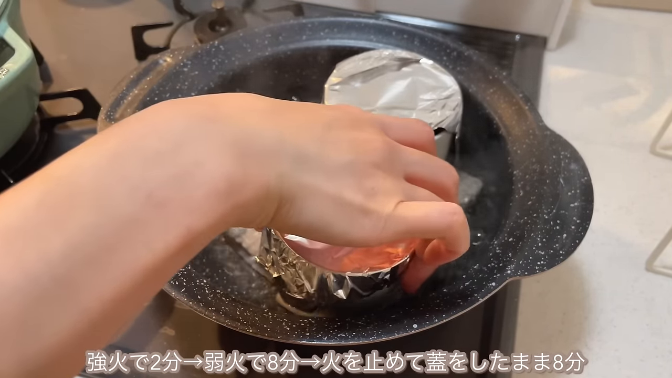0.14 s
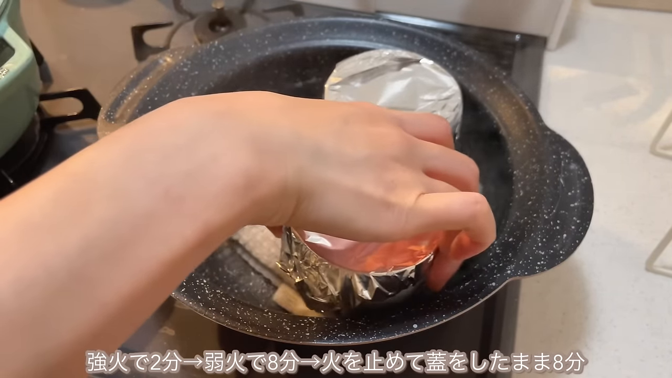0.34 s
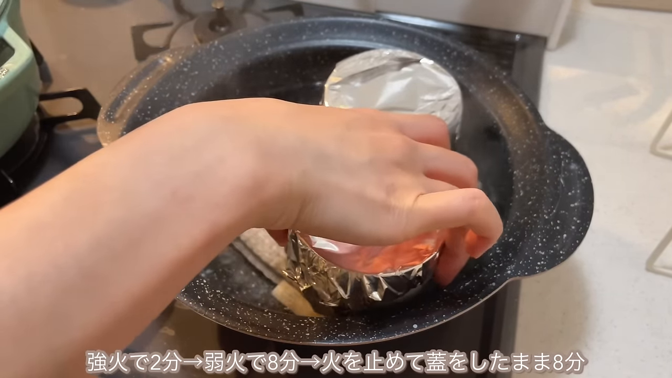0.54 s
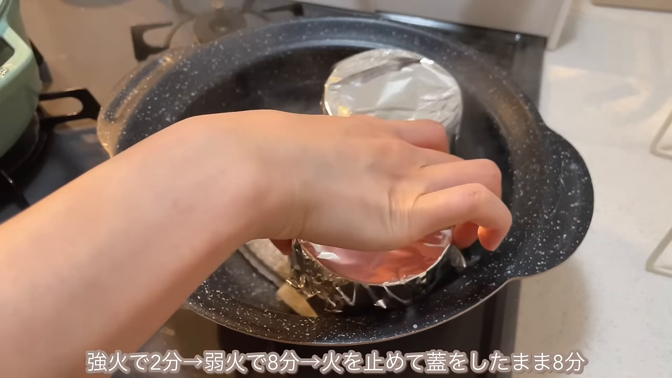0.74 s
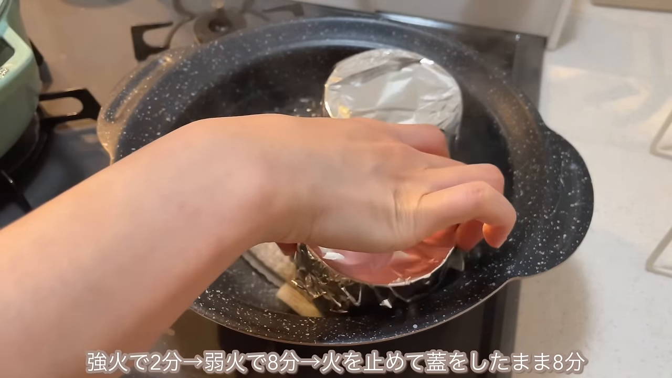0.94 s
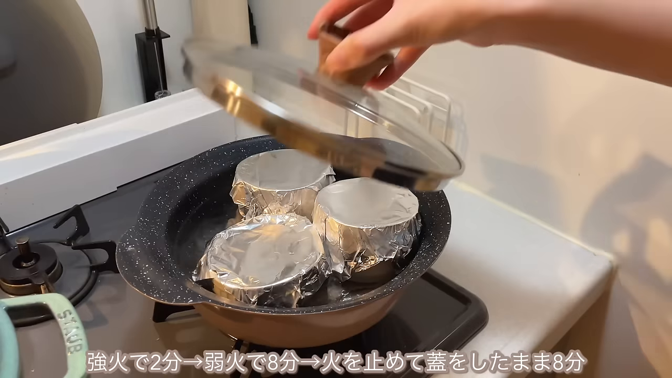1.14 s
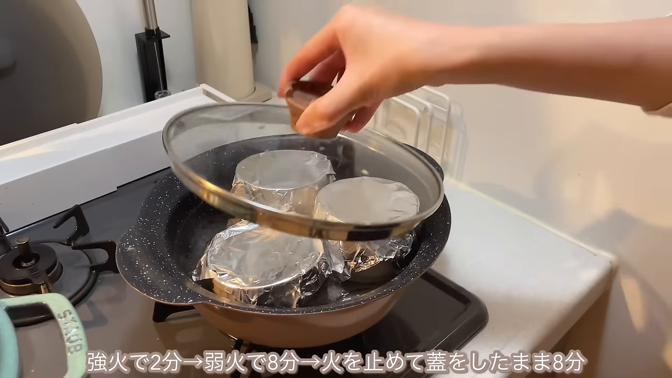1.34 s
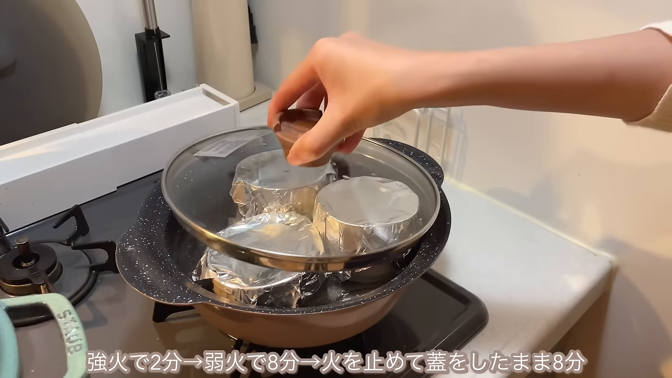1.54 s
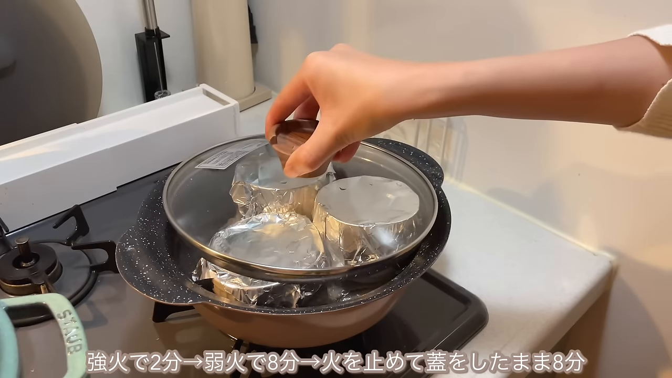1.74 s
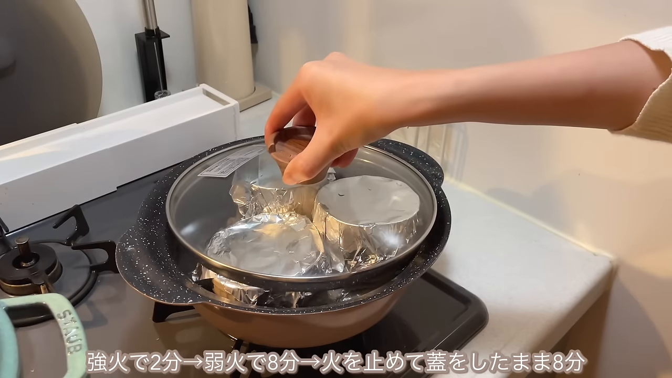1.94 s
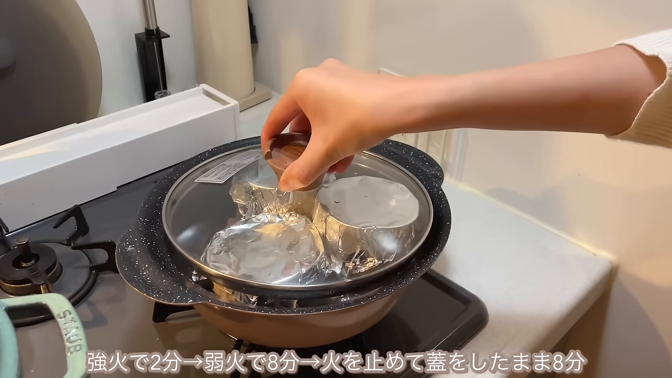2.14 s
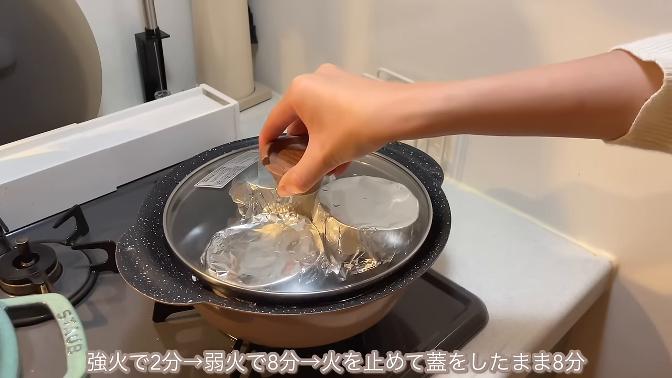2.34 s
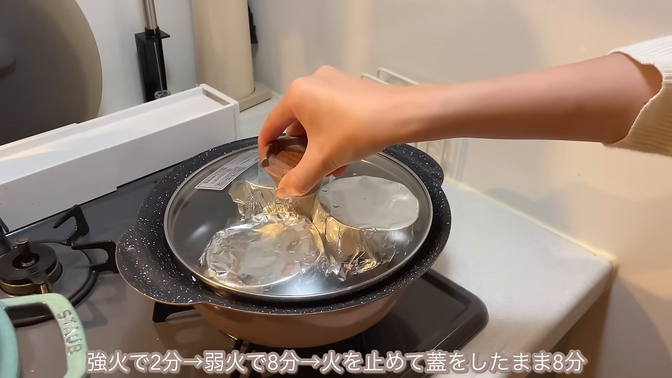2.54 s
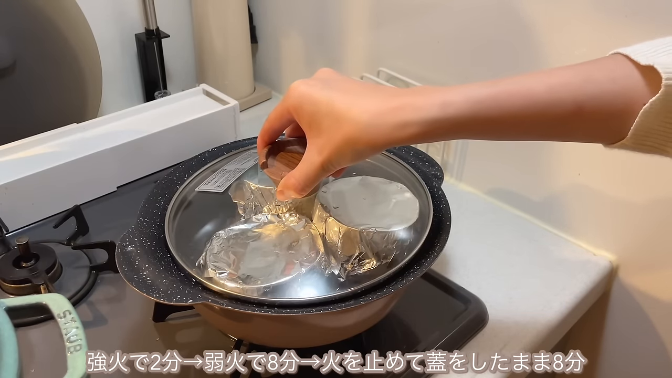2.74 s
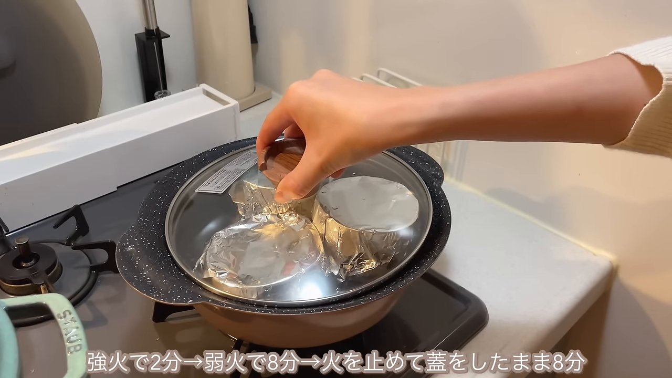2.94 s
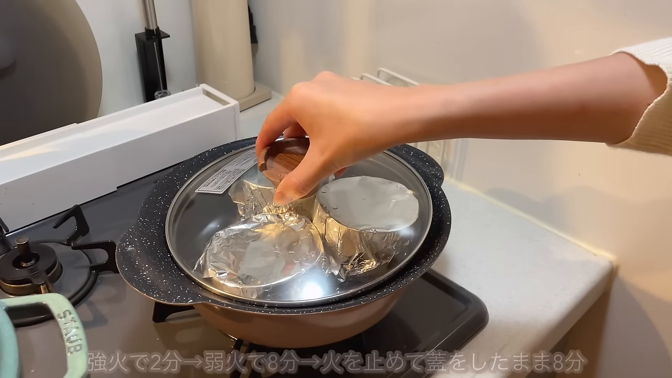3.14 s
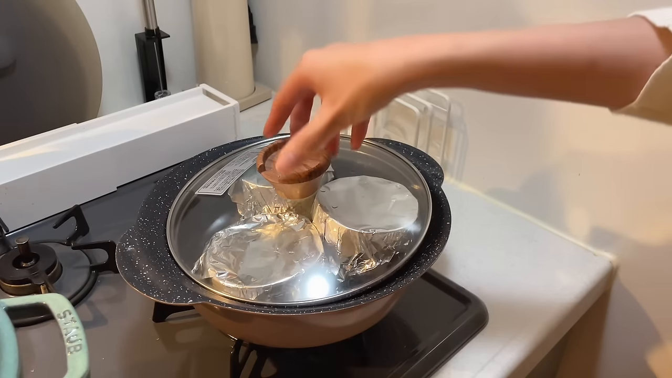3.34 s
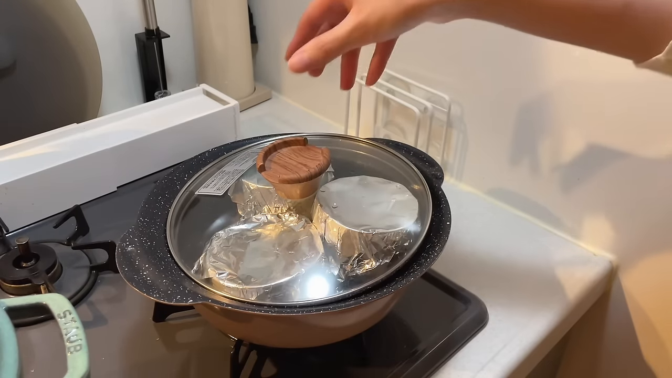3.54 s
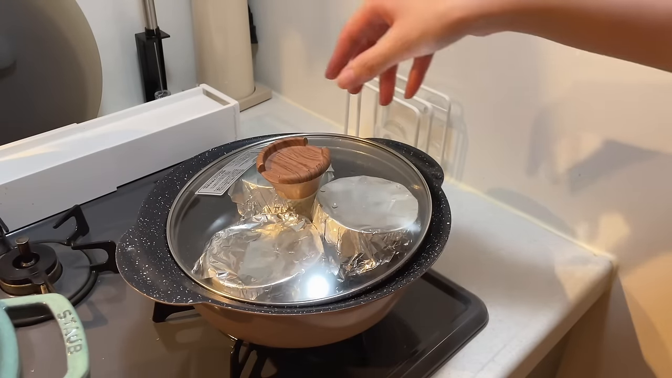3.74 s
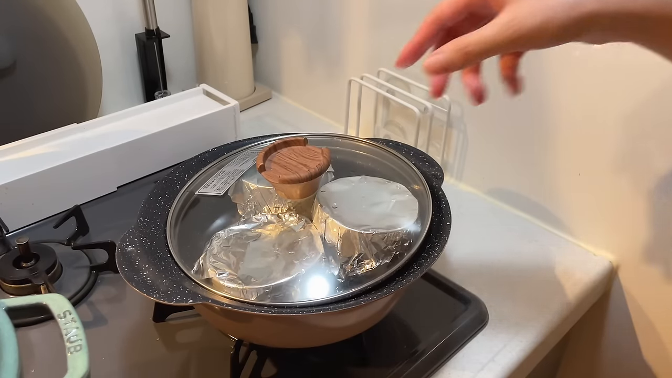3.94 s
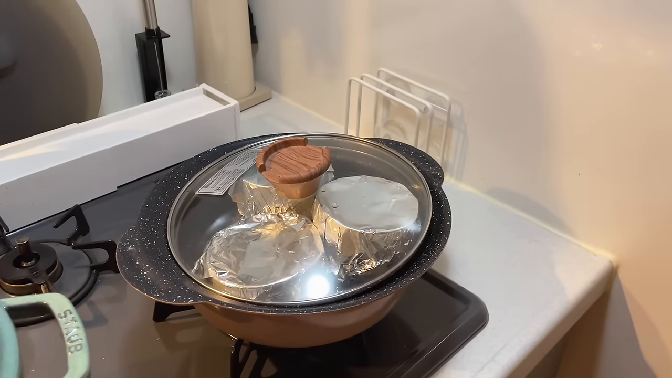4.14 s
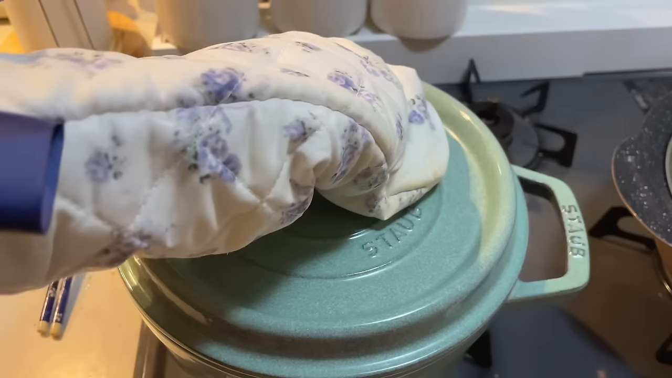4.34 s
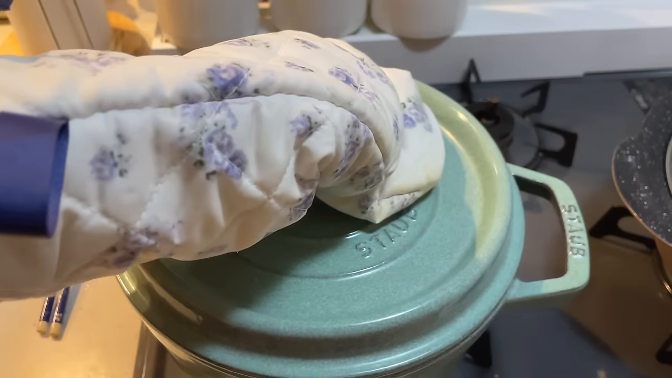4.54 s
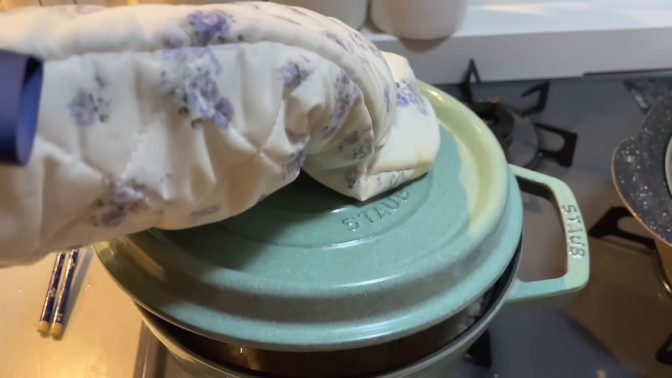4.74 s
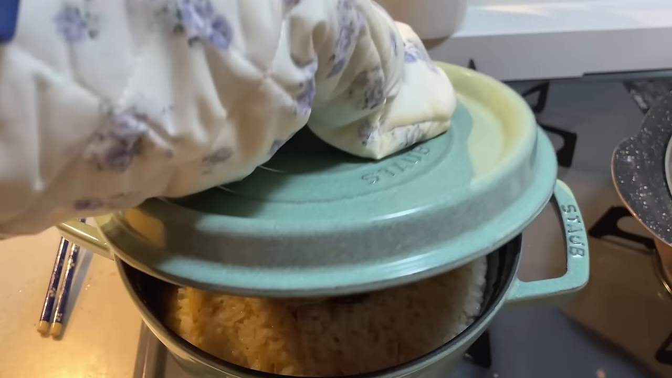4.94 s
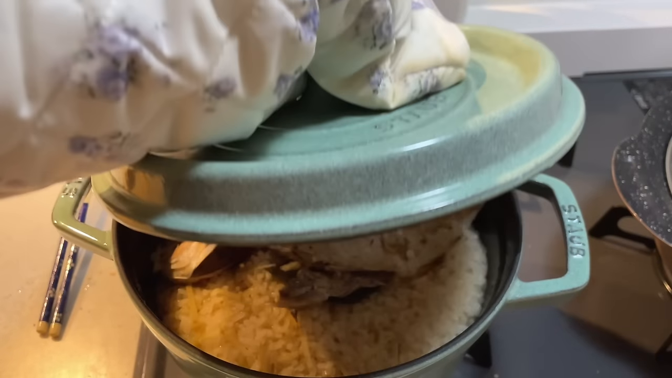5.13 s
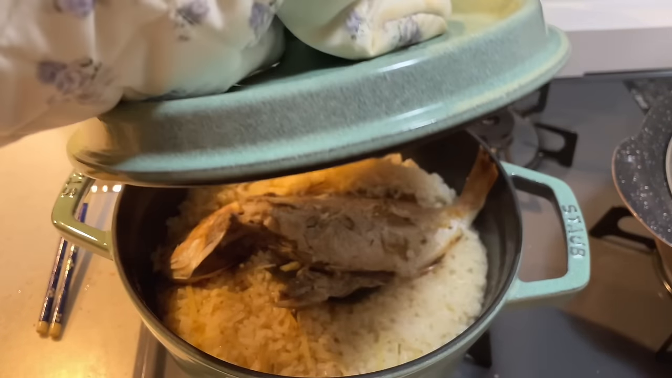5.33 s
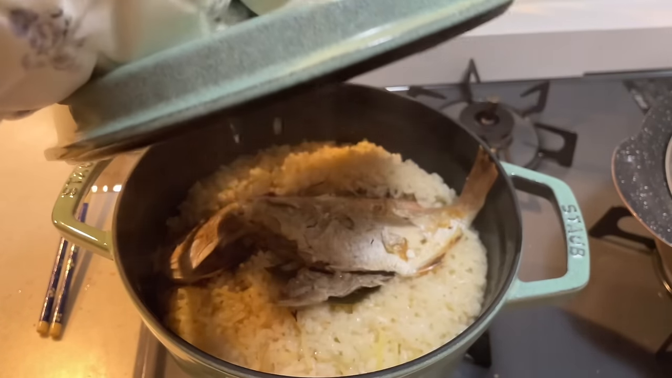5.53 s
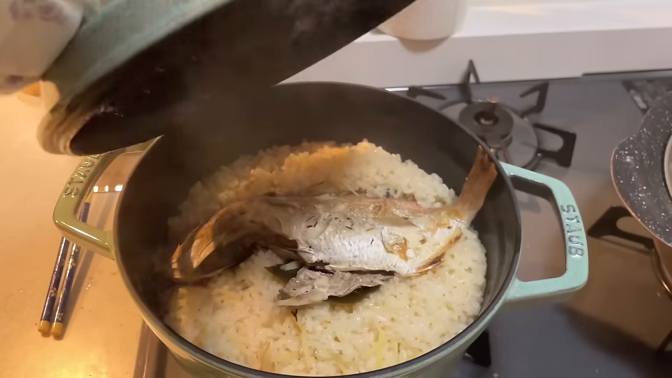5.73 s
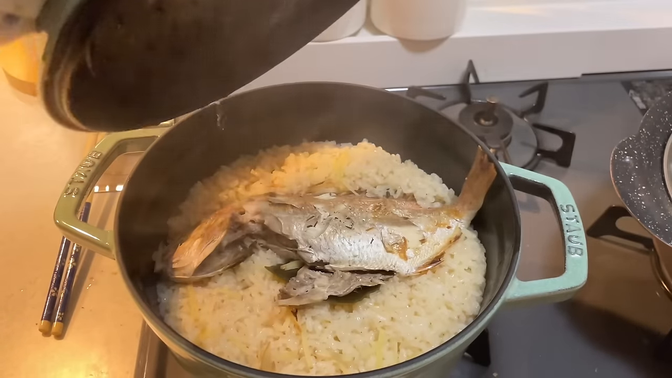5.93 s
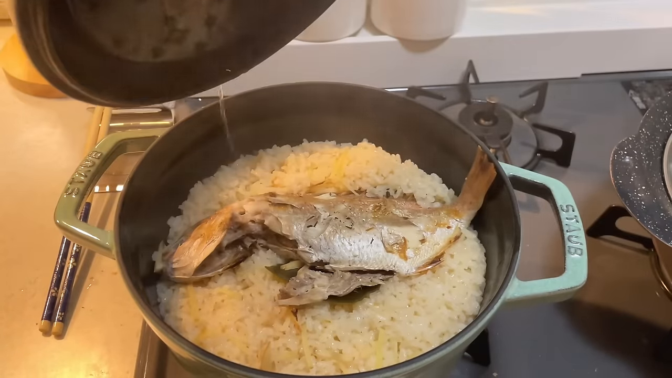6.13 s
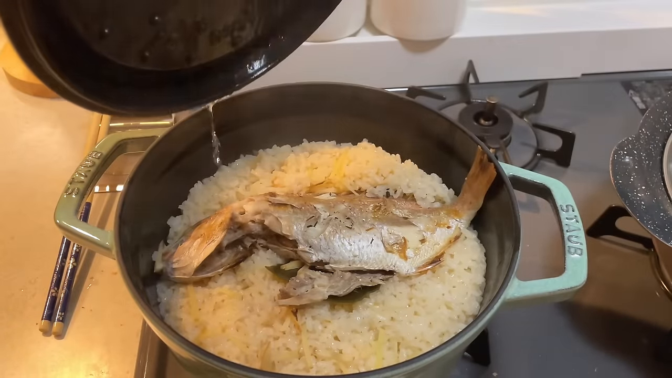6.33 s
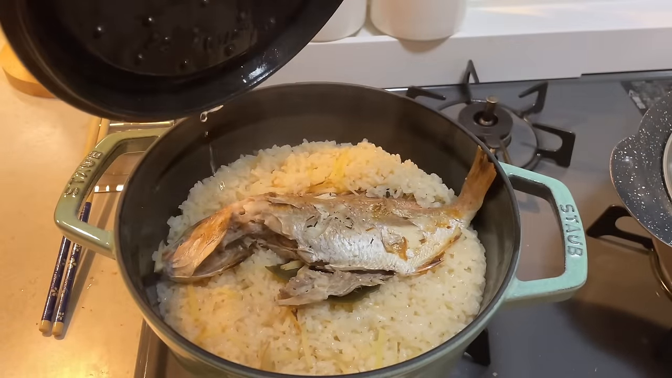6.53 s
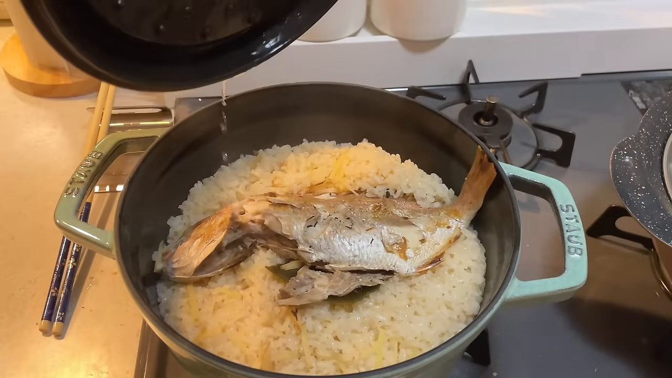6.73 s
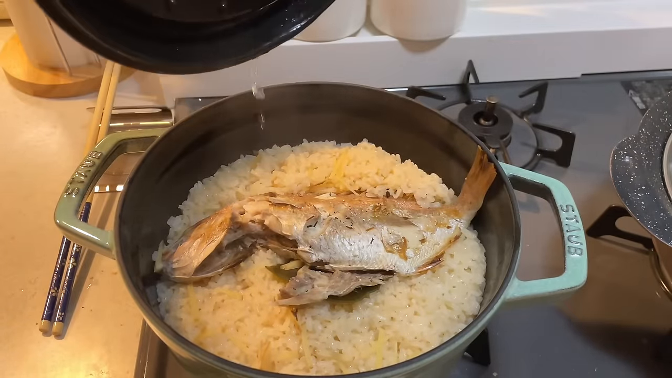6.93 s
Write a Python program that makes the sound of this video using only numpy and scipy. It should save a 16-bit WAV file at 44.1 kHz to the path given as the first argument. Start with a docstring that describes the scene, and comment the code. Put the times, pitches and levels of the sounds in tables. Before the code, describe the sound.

Foil crinkles sharply over a cup with dull taps, a glass lid clinks onto a pan, then a heavy iron lid scrapes, knocks and rings above steam and drips.

```python
"""Foil and lids in a kitchen

Two scenes joined by a hard cut, heard at close range. First, fingers crumple the foil over a cup (swarms of
clicks) while the cup taps a pan (damped modes). Then the foil still buckles now and then, a glass lid is set on
a pan, and an iron lid scrapes, rings and knocks (modes driven by impulses and stick-slip noise); drops of water
snap as noise bursts over fizzing steam. Appliances hum as filtered noise; a phone mixes it all to wide stereo.
"""
import sys
import numpy as np
from scipy import signal
from scipy.fft import rfft, irfft
from scipy.io import wavfile
from scipy.ndimage import uniform_filter1d

SR = 44100
rng = np.random.default_rng(int(sys.argv[2]) if len(sys.argv) > 2 else 0)


def dump(signal):
    """Clip the signal to [-1, 1] and save it as 16-bit WAV at the path in sys.argv[1]."""
    limited = np.clip(np.atleast_2d(signal).T, -1, 1)
    pcm = np.round(limited * 32767).astype(np.int16)
    wavfile.write(sys.argv[1], SR, pcm)


N = 312208
TIME = np.arange(N) / SR
HZ = np.maximum(np.arange(N // 2 + 1) * SR / N, 1)
CUT_S = .988  # the first scene stops dead here


def undb(db):
    """Amplitude ratio: twenty decibels make a factor of ten."""
    return 10 ** (np.asarray(db) / 20)


def since(seconds, fade_db_per_s):
    """Exponential decay: a gain that jumps to 1 at a moment and then loses level steadily."""
    return (TIME >= seconds) * undb(-fade_db_per_s * np.maximum(TIME - seconds, 0))


def colour(x, spectrum):
    """Spectral shaping: filter by (Hz, relative dB) points joined over log frequency, then bring to rms 1."""
    hz, db = np.transpose(spectrum)
    gain = undb(np.interp(np.log(HZ), np.log(hz), db))
    y = irfft(rfft(x) * gain, N)
    return y / np.std(y)


def band(x, low_hz, high_hz):
    """Band-pass filtering by a Butterworth filter."""
    edges = [low_hz, min(high_hz, .45 * SR)]
    return signal.sosfilt(signal.butter(2, edges, "band", fs=SR, output="sos"), x)


def crackle(spread_db):
    """Impulsive noise: samples scatter exponentially in level, giving dense clicks of rms 1."""
    level_db = spread_db * np.minimum(rng.exponential(size=N), 8)
    x = rng.standard_normal(N) * undb(level_db)
    return x / np.std(x)


def walk(rate):
    """Slow fluctuation: noise averaged twice over 1 / rate seconds, standard deviation 1."""
    k = int(SR / rate)
    x = uniform_filter1d(uniform_filter1d(rng.standard_normal(N), k), k)
    return x / np.std(x)


def blows(seconds, db):
    """Impulsive excitation: one single-sample force per blow."""
    x = np.zeros(N)
    x[(np.asarray(seconds) * SR).astype(int)] = undb(db)
    return x


def ring(force, modes, clatter_db, clatter_hz, clatter_t60):
    """Modal synthesis: a force drives one second of decaying modes and noise for unresolved overtones."""
    t = np.arange(SR) / SR
    hz, db, t60 = np.transpose(modes)[:, :, None]
    tones = undb(db) * np.sin(2 * np.pi * hz * t) * undb(-60 * t / t60)
    sides = (-1) ** np.arange(len(modes))[:, None]  # neighbouring modes push opposite ways
    overtones = band(rng.standard_normal(SR), clatter_hz / 3, clatter_hz * 2.2)
    overtones = overtones * undb(clatter_db - 60 * t / clatter_t60)
    contact = (1 - np.exp(-t / 0.0008)) * (1 + 1.6 * np.exp(-t / 0.0035))  # the first milliseconds are loudest
    response = ((sides * tones).sum(axis=0) + overtones) * contact
    return signal.oaconvolve(force, response)[:N]


# Buckles of the foil. Each row: start in seconds, middle level in dB, treble minus middle level in dB.
BUCKLES = [(0.37, -58.5, -10.5), (0.391, -46.5, 4.5), (0.482, -44.5, 3.5), (0.523, -49, -0.5),
           (0.573, -33, 9), (0.58, -26.5, 1.5), (0.661, -50, 7), (0.742, -40.5, 2.5), (0.809, -43.5, 0),
           (0.826, -44.5, -2), (0.934, -40.5, -5.5), (0.95, -35, 2.5), (0.97, -28.5, 0.5), (1.916, -50, -4),
           (2.155, -47, 8.5), (2.516, -65.5, 1), (2.66, -60.5, -7), (2.908, -54, -3.5), (3.262, -53.5, 1.5),
           (3.315, -55.5, -2)]
# Spectrum of the foil clicks. Each row: frequency in Hz, relative level in dB.
FOIL_SPECTRUM = [(300, -19.5), (900, -6.5), (1400, 9.5), (2200, 3), (3500, 7), (4500, -4), (7000, 0),
                 (9000, 1.5), (13000, -3.5), (16000, -9)]
# Squeezes of the fingers, after which the foil creeps less and less. Each row: start in seconds, level in dB.
SQUEEZES = [(.392, -71.5), (.49, -45.5), (.6, -50.5), (.75, -47), (.85, -47.5), (.92, -45)]
PATCHES_HZ = np.geomspace(500, 8300, 12)  # edges of the foil bands that swell on their own
BUILD_S, BUCKLE_T60_S = 0.0046, 0.045
CREEP_FADE_DB_PER_S, RESTING_DB = 61, -68


def foil():
    """Buckling of a thin sheet: swarms of clicks build and fade, bunch up and wander in colour."""
    clicks = colour(crackle(spread_db=3.5) * undb(1.8 * walk(300)), FOIL_SPECTRUM)
    middle = sum(band(clicks, low, high) * undb(2.2 * walk(120))
                 for low, high in zip(PATCHES_HZ, PATCHES_HZ[1:]))
    treble = band(clicks, 9400, 15000)

    # Creep in the first scene: the strongest squeeze still fading, above a resting floor
    squeezed = [undb(db) * since(s, CREEP_FADE_DB_PER_S) for s, db in SQUEEZES]
    creep = undb(RESTING_DB) + np.max(squeezed, axis=0)
    ticks = band(crackle(spread_db=8.0), 1500, 15000) * undb(-8.5)  # lone creases snapping
    ticks = ticks * (TIME > SQUEEZES[0][0])
    rustle = band(crackle(spread_db=7.0), 280, 897.3)  # the cup shifts under the fingers
    rustle = rustle * undb(2.8 * walk(25) + 2.0)
    out = creep * (middle + treble + rustle + ticks) * (TIME < CUT_S)

    for s, db, treble_db in BUCKLES:
        t = TIME - s
        build = np.clip(t / BUILD_S, 0, 1) ** 2
        fade = undb(-60 * np.maximum(t - BUILD_S, 0) / BUCKLE_T60_S)
        swell = build * fade * ((TIME < CUT_S) | (s > CUT_S))  # nothing rings on across the cut
        for part, part_db in ((middle, db), (treble, db + treble_db)):
            burst = swell * part
            # give every burst the energy of its swell, however the clicks fall
            out += undb(part_db) * burst * np.linalg.norm(swell) / np.linalg.norm(burst)
    return out


# Touches of lid and pan. Each row: start in seconds, pan level in dB, favoured pitch in Hz, glass level in dB.
SET_DOWN = [(1.802, -59, 900, -89), (1.918, -31, 595, -47.5), (1.932, -34, 480, -45),
            (1.944, -33.5, 320, -55), (2.034, -54.5, 890, -54.5), (2.154, -26.5, 601, -26),
            (2.181, -23.5, 648, -24), (2.221, -39, 692, -43.5), (2.237, -39, 1100, -48.5),
            (2.906, -30, 620, -65), (3.127, -57.5, 801, -91), (3.746, -58, 790, -95)]
# Modes of the pan. Each row: frequency in Hz, level in dB, t60 in seconds.
PAN_MODES = [(97.5, 3, 0.18), (353, -2.5, 0.03), (420.5, -5, 0.098), (498, -4.5, 0.035), (615, 1, 0.036),
             (720, 5.5, 0.0081), (1034, -10.5, 0.19), (1106, -6.5, 0.07), (1494, -13, 0.16),
             (1857, -16.5, 0.085), (2328, -13, 0.1)]
# Modes of the glass lid, one entry per mode: frequency in Hz, level in dB, t60 in seconds when undamped.
GLASS_HZ = [1721, 2134, 2180, 2397, 2547, 2722, 3238, 4177, 4387, 4700, 5275, 6072, 6810, 7558]
GLASS_DB = [-9.5, -5, -6.5, -11.5, -8, -2.5, -6.5, -10, -16, -15.5, -15, -14, -17.5, -15]
GLASS_T60_S = [0.072, 0.16, 0.078, 0.19, 0.03, 0.035, .12, 0.068, 0.11, 0.059, 0.05, .09, 0.16, 0.082]
HELD_BELOW_DB, HELD_T60_SHARE = -40, 0.14  # gentle touches are damped by the hand


def glass_lid():
    """Coupled impact: each touch rings the glass and the pan modes nearest the pitch its spot favours."""
    s, _, _, glass_db = np.transpose(SET_DOWN)
    free_modes = np.transpose([GLASS_HZ, GLASS_DB, GLASS_T60_S])
    held_modes = np.multiply(free_modes, [1, 1, HELD_T60_SHARE])
    held = glass_db < HELD_BELOW_DB
    out = ring(blows(s[~held], glass_db[~held]), free_modes, -2.5, 2600., 0.2)
    out += ring(blows(s[held], glass_db[held]), held_modes, -2.8, 3000., 0.046)

    hz, db, t60 = np.transpose(PAN_MODES)
    for s, pan_db, spot_hz, _ in SET_DOWN:
        octaves_off = np.abs(np.log2(hz / spot_hz))
        favoured = np.transpose([hz, db - 7.8 * octaves_off, t60])
        out += ring(blows([s], pan_db), favoured, -4.5, spot_hz, 0.064)
    return out


# Jolts of the seated iron lid. Each row: start in seconds, level in dB.
JOLTS = [(4.554, -21)]
# Drags over the pot rim, pushing harder until the lid lets go.
# Each row: start in seconds, length in seconds, force at the end in dB, upper limit of the grain in Hz.
DRAGS = [(4.486, 0.028, -64, 12000), (4.554, 0.04, -61.5, 1200), (4.743, 0.03, -82, 11100)]
DRAG_RISE_DB, DRAG_RELEASE_DB_PER_S = 13.5, 200.5
# Modes of the lid while it touches the pot, one entry per mode: frequency in Hz, level in dB, t60 in seconds.
SEATED_HZ = [100, 255, 291, 345, 390, 781, 839, 1718, 2120, 2756, 3420, 4945, 6648, 10550, 12790, 15160]
SEATED_DB = [-6, 2.5, -2, -3.5, -0.5, -4.5, -4.5, -6, -19, -17, -20.5, -25, -32.5, -31.5, -30, -32]
SEATED_T60_S = [0.095, .11, 0.23, 0.12, 0.11, 0.08, .05, 0.0604, .07, 0.21, 0.21, .18, 0.078, 0.18, .23,
                .25]
# Knocks of the lid on something behind the pot. Each row: start in seconds, level in dB.
KNOCKS = [(5.657, -22.5), (5.665, -27)]
# Modes that the knocks excite. Each row: frequency in Hz, level in dB, t60 in seconds.
KNOCKED_MODES = [(95.5, -16.5, 0.59), (243.3, -15, 0.156), (362.8, -11, 0.096), (510, -22.5, 0.27),
                 (689.4, -5, 0.058), (790, -6, 0.037), (994, -6, 0.033), (1250, -13, 0.13),
                 (1634, -6, 0.016), (2730, -39, 0.15)]


def iron_lid():
    """Stick-slip friction: grainy drags and sharp jolts drive the modes of the seated lid; later it knocks."""
    grip = crackle(spread_db=1.5)
    force = band(blows(*np.transpose(JOLTS)), 420, 12000)  # jolts spare the lowest modes
    for s, length, db, top_hz in DRAGS:
        still_to_rise = np.clip(1 - (TIME - s) / length, 0, 1)
        released_s = np.maximum(TIME - s - length, 0)
        push_db = db - DRAG_RISE_DB * still_to_rise - DRAG_RELEASE_DB_PER_S * released_s
        force = force + band((TIME > s) * undb(push_db) * grip, 80, top_hz)
    seated_modes = np.transpose([SEATED_HZ, SEATED_DB, SEATED_T60_S])
    scrape = ring(force, seated_modes, -4.5, 1130.0, 0.076)
    knock = ring(blows(*np.transpose(KNOCKS)), KNOCKED_MODES, -9.0, 630.0, 0.32)
    return scrape + knock


# Rings of the lifted lid. Each row: start in seconds, level in dB, cause (0 touch at the rim, 1 knock).
RINGS = [(4.785, -10.5, 0), (4.805, -9, 0), (5.664, 3, 1)]
# Modes of the free lid. Each row: frequency in Hz, level after a touch at the rim in dB,
# level after a knock in dB, t60 in seconds.
FREE_MODES = [(665, -45.5, -58.5, 2.04), (1911, -58, -52, 1.05), (1933.3, -75, -52, 1.05),
              (3365, -50, -63, 0.51), (4950, -64, -62.5, 0.4)]


def lifted_lid():
    """Free vibration: clear of the pot the modes last, one close pair beats, and the cause sets their mix."""
    modes = np.array(FREE_MODES)
    out = np.zeros(N)
    for s, db, cause in RINGS:
        excited = modes[:, [0, 1 + round(cause), 3]]
        out += ring(blows([s], db), excited, -57.5, 5200.0, 0.14)
    return out


# Taps of the cup on the pan. Each row: start in seconds, level in dB.
CUP_TAPS = [(.008, -49.5), (.058, -46.5), (.305, -59.5), (.335, -56.5), (0.583, -50), (0.828, -45)]
# Modes of the foil-covered cup. Each row: frequency in Hz, level in dB, t60 in seconds.
CUP_MODES = [(710, -7, .04), (820, 3.5, 0.016), (1190, 0, 0.022), (1608, -13.5, 0.024)]


def cup():
    """Heavily damped modes: the foil-covered cup knocks dully."""
    return ring(blows(*np.transpose(CUP_TAPS)), CUP_MODES, 2.0, 1000., 0.04)


# The loudest drops and bursting bubbles. Each row: start in seconds, peak level in dB, nominal pitch in Hz.
DROPS = [(5.052, -43.5, 13900), (5.101, -41.5, 4850), (5.221, -44, 11500), (5.253, -42, 3360),
         (5.419, -34, 7050), (5.545, -35, 13300), (5.568, -38, 12700), (5.637, -37.5, 12300),
         (5.649, -38.5, 5100), (5.929, -51, 13300), (6.144, -46.5, 4500), (6.168, -39, 7200),
         (6.1, -48, 1380), (6.209, -45.5, 5600), (6.347, -47.5, 11930), (6.389, -36.5, 13000),
         (6.659, -47.5, 10870), (6.798, -45.5, 11200), (7.029, -43.5, 9040)]
SMALL_DROPS, DRIPS_FROM_S = 40, 4.9
SMALL_DROP_DB, SMALL_DROP_HZ = -62.5, 7600  # middle of a 12 dB and a two-octave range
STEAM_FROM_S, STEAM_RISE_S, STEAM_DB, STEAM_FADE_DB_PER_S = 4.25, 0.09, -67.5, 2.5


def water():
    """Transient noise: steam fizzes, each drop is a brief snap around its pitch, small ones fall at random."""
    fizz = colour(crackle(spread_db=3.5),
                  [(800, 5.0), (3500, -11.0), (7000, -15.5), (13000, -9.0), (16000, -21)])  # (Hz, dB)
    rise = np.clip((TIME - STEAM_FROM_S) / STEAM_RISE_S, 0, 1)
    steam = undb(STEAM_DB) * rise * since(STEAM_FROM_S, STEAM_FADE_DB_PER_S)
    out = steam * undb(0.5 * walk(51)) * fizz

    t = np.arange(400) / SR
    when, size, pitch = rng.random((SMALL_DROPS, 3)).T
    small = zip(DRIPS_FROM_S + when * (TIME[-len(t)] - DRIPS_FROM_S),
                SMALL_DROP_DB + 12 * (size - .5),
                SMALL_DROP_HZ * 2 ** (2 * pitch - 1))
    for s, db, hz in [*DROPS, *small]:
        burst = rng.standard_normal(len(t)) * undb(-60 * t / .004)
        snap = band(burst, hz / 1.8, hz * 1.6)
        i = int(s * SR)
        out[i:i + len(t)] += undb(db) * snap / np.abs(snap).max()
    return out


# Spectrum of the appliances. Each row: frequency in Hz, relative level in dB per Hz.
HUM_SPECTRUM = [(25, -18), (40, -4), (62, -1), (92, -0.5), (125, -3), (170, -11), (250, -11), (400, -17),
                (900, -26), (1500, -34), (2900, -45), (3900, -42), (6000, -50), (9500, -47), (13000, -44),
                (15000, -57.5)]
HUM_DB, DRONE_DB = -56.5, -59.5


def hum():
    """Stationary coloured noise: fan and fridge waver a little; a low drone joins in the first scene."""
    noise = colour(rng.standard_normal(N), HUM_SPECTRUM)
    drone = band(noise, 77, 1400)
    drone = (TIME < CUT_S) * drone / np.std(drone)
    return undb(1.2 * walk(15.0)) * (undb(HUM_DB) * noise + undb(DRONE_DB) * drone)


ROOM_T60_S, TREBLE_T60_S, ROOM_DB = 0.34, .13, -10.5


def room(x):
    """Reverberation: direct sound plus a diffuse tail that decays faster in the treble."""
    t = np.arange(SR // 2) / SR
    noise = rng.standard_normal(len(t))
    dull = band(noise, 94, 5300)
    tail = dull * undb(-60 * t / ROOM_T60_S) + (noise - dull) * undb(-60 * t / TREBLE_T60_S)
    tail = tail * (t > .003)
    tail = tail / np.sqrt(np.sum(tail ** 2))
    return x + undb(ROOM_DB) * signal.fftconvolve(x, tail)[:N]


# Stereo pair by pitch. Each row: frequency in Hz, phase by which the right leads in radians,
# likeness of the sides from 0 to 1, left minus right level in dB.
STEREO_PAIR = [(100, -.1, .97, 1.6), (300, -.1, .8, 2.5), (700, 1.2, .4, 5), (1500, .2, .6, 4),
               (2900, -1.3, .7, 4.5), (5000, -.6, .6, 4.5), (6000, 1.3, .6, 2.5), (7900, 2.7, .9, 1.5),
               (8440, 3.14, .99, .1), (10000, 4.1, .88, .1), (12000, 5.4, .88, .1), (14500, 6.28, .99, .1)]


def mix(dry):
    """Interchannel coherence: the phone turns the phase between sides and blends in a scattered pick-up."""
    hz, *columns = np.transpose(STEREO_PAIR)
    lead, like, balance_db = (np.interp(np.log(HZ), np.log(hz), c) for c in columns)
    like = np.clip(like, 0, 1)
    left, right = rfft(dry)
    scatter = 1
    for lag in (29, 71, 113, 167):  # all-pass chain, lags in samples
        z = np.exp(-2j * np.pi * HZ * lag / SR)
        scatter = scatter * (z - .5) / (1 - .5 * z)
    left = left * np.exp(-.5j * lead) * undb(balance_db / 2)
    blend = like * np.exp(.5j * lead) + np.sqrt(1 - like ** 2) * scatter
    right = right * blend * undb(-balance_db / 2)
    return irfft([left, right], N)


def scene():
    """Superposition: sources excite the room, whose first tail ends at the cut; lifted lid and hum stay dry."""
    first = TIME < CUT_S
    sources = foil() + cup() + glass_lid() + iron_lid()
    first_scene = room(sources * first) * first
    second_scene = room(sources * ~first + water())
    mono = first_scene + second_scene + lifted_lid() + hum()
    return np.array([mono, mono])


TOP_HZ = 16100


def record(dry):
    """Band limiting: each side of the cut is mixed alone, then a steep low-pass removes the top."""
    first = TIME < CUT_S
    joined = mix(dry * first) * first + mix(dry * ~first)
    return signal.sosfilt(signal.ellip(8, .2, 70, TOP_HZ, fs=SR, output="sos"), joined)


dry = scene()
out = record(dry)
dump(out)
```